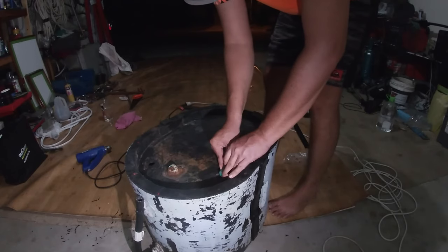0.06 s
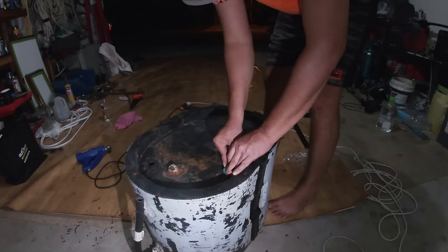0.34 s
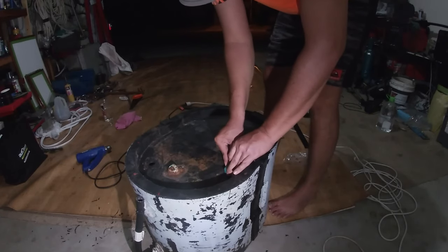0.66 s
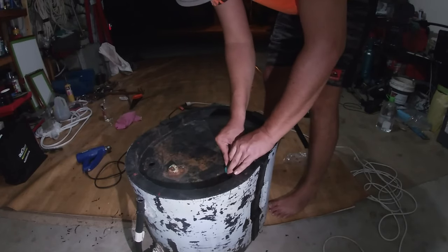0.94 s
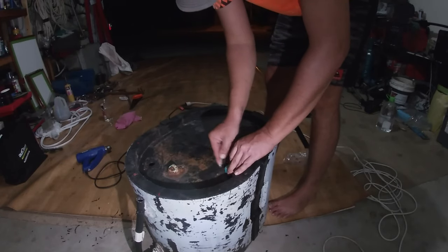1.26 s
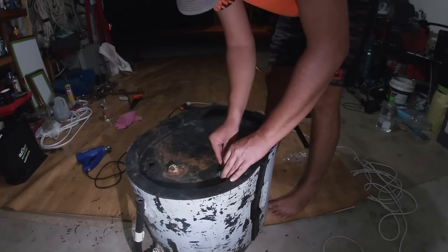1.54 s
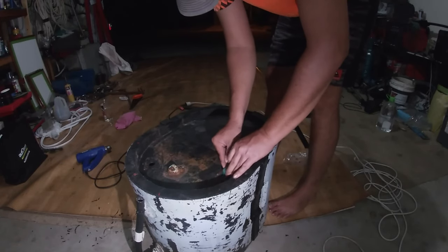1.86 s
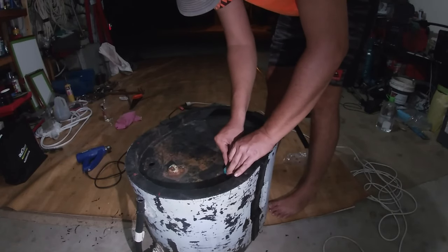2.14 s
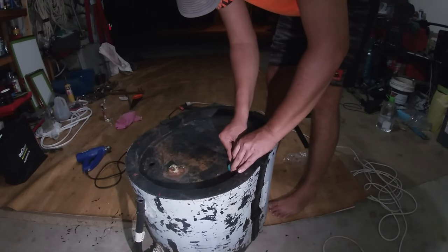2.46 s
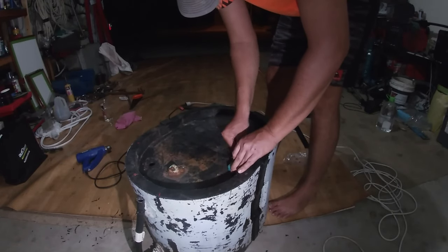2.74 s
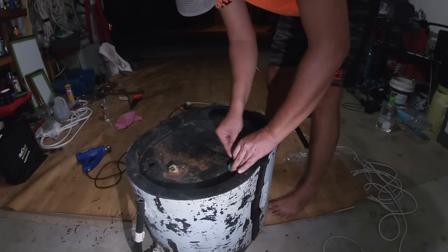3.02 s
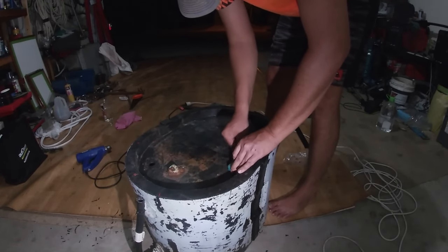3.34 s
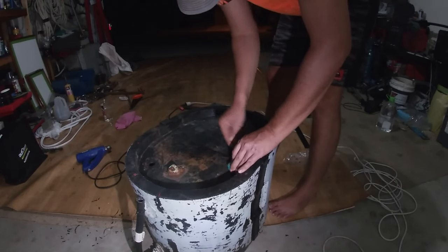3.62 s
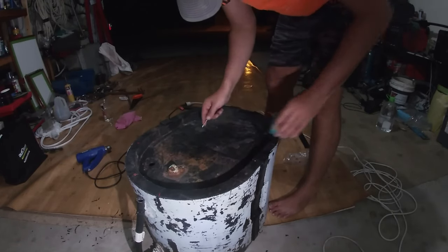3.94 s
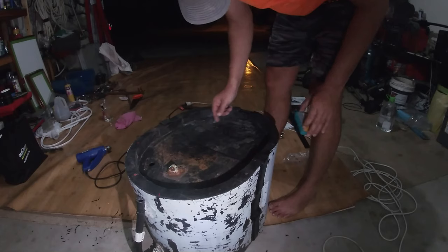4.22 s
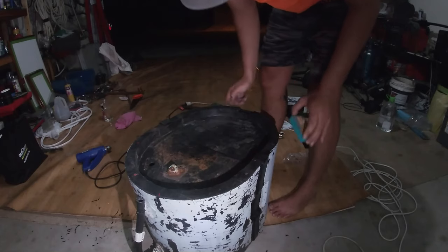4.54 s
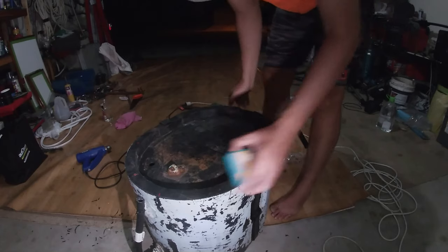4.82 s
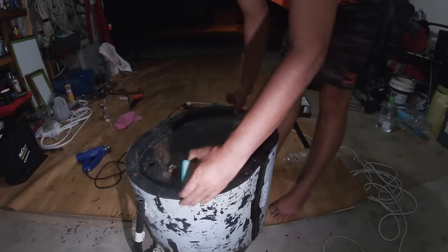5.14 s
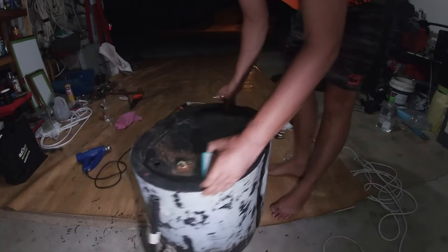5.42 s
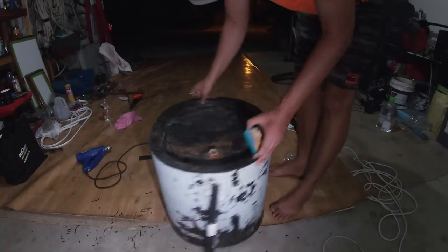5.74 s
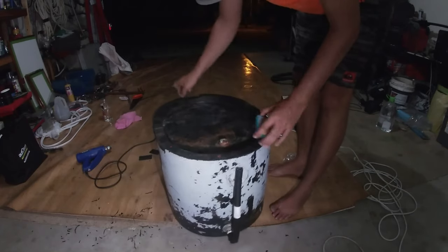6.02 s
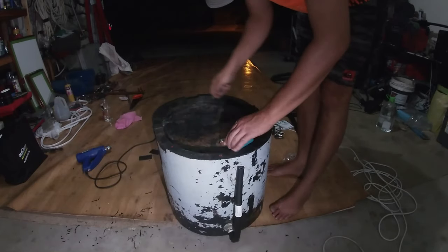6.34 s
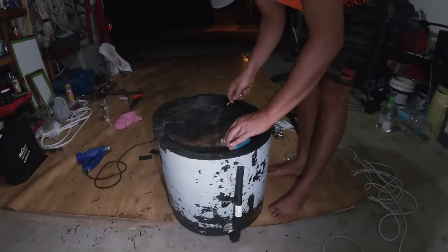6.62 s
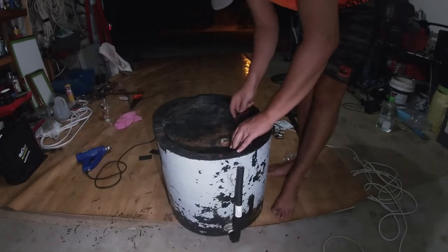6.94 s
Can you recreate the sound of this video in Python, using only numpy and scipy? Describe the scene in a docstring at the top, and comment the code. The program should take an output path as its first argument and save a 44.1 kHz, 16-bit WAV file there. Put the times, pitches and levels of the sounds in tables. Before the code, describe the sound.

In a quiet garage, irregular nearby scrapes and ticks come from a blade cutting at a big plastic tub, whose hollow walls vibrate and briefly groan. A sharp snap comes partway through, then the loudest sound, a crack with a deep judder as the plastic springs back. The tub's base then crunches and hisses across the sandy floor, and hands and tool knock on the rim.

```python
"""A blade scores the rim of a thick plastic tub in a garage: its stick-slip shakes the walls
and rasps at the tip. The rim snaps once, groans, then gives way with a crack and a booming
judder as the whole tub springs back. The tub is dragged round over the gritty floor,
squeaking at its base, and hands and tool knock on the rim again."""
import sys
import numpy as np
from scipy import signal
from scipy.fft import rfft, irfft
from scipy.io import wavfile
from scipy.ndimage import uniform_filter1d

SR = 44100
rng = np.random.default_rng(int(sys.argv[2]) if len(sys.argv) > 2 else 0)


def store_wav(level_fs):
    """Save 16-bit WAV to argv[1]."""
    pcm = np.round(np.clip(np.atleast_2d(level_fs), -1, 1) * 32767)
    wavfile.write(sys.argv[1], SR, pcm.T.astype(np.int16))


N = 316179
TIME = np.arange(N) / SR

# resonances of the tub: pitch_hz, level_db
TUB_MODES = [(42, -10), (66, -3), (87, 0), (103, -3), (146, -7.5), (221, -1), (254, -4.5), (283, -7.5),
             (322, -8.5), (350, -10), (380, -9.5), (436, -11), (482, -8.5), (575, -12.5), (610, -13.5),
             (645, -16), (727, -18), (788, -15), (842, -15), (894, -16.5), (975, -19.5), (1060, -22),
             (1155, -25.5), (1272, -21.5), (1350, -25.5), (1452, -19.5), (1545, -44)]
FLEX_TOP_HZ, WALL_PIVOT_HZ = 180, 420   # the whole tub flexes below the first; tone tilts about the second


def from_db(db):
    return np.exp(np.asarray(db) * (np.log(10) / 20))


def rms_one(x):
    return x / np.sqrt(np.mean(x ** 2) + 1e-20)


def peak_one(x):
    return x / np.abs(x).max()


def at_hz(points, hz, column=1):
    points = np.array(points)
    return np.interp(np.log(np.maximum(hz, 1)), np.log(points[:, 0]), points[:, column])


def cut(x, hz, kind, order=2):
    return signal.sosfilt(signal.butter(order, np.clip(hz, 10, .45 * SR), kind, fs=SR, output="sos"), x)


def colour(x, spectrum, size=4096):
    """Minimum-phase EQ with the given curve."""
    cepstrum = irfft(np.log(from_db(at_hz(spectrum, np.fft.rfftfreq(size, 1 / SR)))))
    cepstrum[1:size // 2] *= 2
    cepstrum[size // 2 + 1:] = 0
    return signal.fftconvolve(x, irfft(np.exp(rfft(cepstrum))))[:len(x)]


def resonate(x, hz, width_hz):
    """Two-pole resonance with unity gain at its peak."""
    r = np.exp(-np.pi * width_hz / SR)
    feedback = [1, -2 * r * np.cos(2 * np.pi * hz / SR), r * r]
    return signal.lfilter(np.array([1, 0, -1]) * (1 - r * r) / 2, feedback, x + 1e-18)


def mode_width(hz, base_hz=7.0, loss=.012):
    """Higher modes are broader, so they die sooner."""
    return base_hz + loss * hz


def drift(per_s):
    """Smooth random wander at unit RMS."""
    knots = rng.standard_normal(int(N / SR * per_s) + 2)
    return rms_one(np.interp(TIME * per_s, np.arange(len(knots)), knots))


def slips(per_s, spread_db, smooth):
    """Friction: tiny releases of uneven size at random moments, over smooth sliding noise."""
    sizes = from_db(spread_db * np.minimum(rng.exponential(1, N), 4)) * rng.choice([-1, 1], N)
    releases = rms_one(sizes * (rng.random(N) < per_s / SR))
    return rms_one(releases + smooth * rng.standard_normal(N))


def even(x, size=2205):
    """A steady push keeps the vibration at an even strength."""
    return x / np.sqrt(np.abs(uniform_filter1d(x * x, size)) + 1e-12)


def gestures(rows, levels_db, sag_db_per_s, release_db_per_s, linger_s=0):
    """A dB envelope per stroke: it touches, bites, swells, sags while the hand slows, and dies away."""
    touch_s, touch_db, swell_db = .015, 15.5, 15.5
    curves = []
    for (start, attack, hold, *_), db in zip(rows, levels_db):
        top = start + attack
        end = top + hold + linger_s
        bite_db, eased_db = db - swell_db, db - sag_db_per_s * hold
        path_db = [bite_db - touch_db, bite_db, db, eased_db, eased_db - release_db_per_s]
        curves.append(np.interp(TIME, [start - touch_s, start, top, end, end + 1], path_db, left=-np.inf))
    return np.array(curves)


def leading(curves, values):
    """The value of the strongest stroke of the moment, crossfaded at the changes."""
    return uniform_filter1d(values[curves.argmax(axis=0)], size=900)


def tub(force, wall_db, tilt, flex_db, damping):
    """Friction drives the tub's slow flexing and its wall modes; a sharper bite favours the high ones."""
    flex, wall = 0, 0
    for k, (hz, db) in enumerate(TUB_MODES):
        mode = (-1) ** k * from_db(db) * resonate(force, hz, mode_width(hz) * damping)
        if hz < FLEX_TOP_HZ:
            flex += mode
        else:
            wall += mode * from_db(np.clip(tilt, -10, 10) * np.log2(hz / WALL_PIVOT_HZ))
    return from_db(flex_db) * even(flex, size=1500) + from_db(wall_db) * even(wall, size=900)


def blade(flex_gain_db=0.55, rasp_gain_db=3.0, bite_tilt=1.7, catch_db=2.5, snag_db=-8):
    """The edge catches and lets go in the plastic; the rasp at the tip fades first as a stroke slows."""
    # strokes of blade and fingers along the rim:
    # start_s, attack_s, hold_s, wall_db, tilt_db_per_octave, flex_db, rasp_db
    strokes = [(-0.03, .04, 0.24, -44, -3, -39.5, -52.5), (0.492, 0.095, 0.057, -36, 0, -33.5, -50),
               (0.908, 0.029, 0.093, -45.5, -1, -44, -58), (1.078, 0.066, 0.2, -67, 1, -74, -67.5),
               (1.32, 0.021, .3, -57, -7.5, -59, -64.5), (1.69, 0.11, 0.029, -37, 1.5, -65.5, -50.5),
               (2.04, 0.017, 0.13, -48.5, -8, -58.5, -68), (2.11, 0.1, 0.012, -38, 2, -48, -49),
               (2.25, 0.032, 0.23, -44, -3, -45.5, -60), (2.453, 0.1, .08, -35, -1, -35, -47),
               (2.605, 0.047, 0.078, -37.5, 0, -36, -47.5), (2.985, 0.033, 0.098, -36, 0.5, -36, -44.5),
               (3.125, 0.022, 0.037, -34.5, -3.5, -33.5, -51.5),
               (3.226, 0.037, 0.057, -51.5, -8.5, -56.5, -69), (3.548, 0.018, 0.093, -43, -3.5, -49.5, -56),
               (3.65, 0.026, 0.071, -36, 2, -43, -43.5), (3.733, 0.0058, .045, -21.5, -4, -24.5, -34.5),
               (3.9, .05, 0.037, -52, -4, -49, -56), (4.057, 0.086, .13, -63, -9, -64, -66.5),
               (6.643, .04, 0.0079, -44.5, 1, -62, -52.5), (6.83, 0.053, 0.023, -64.5, 3, -76, -72),
               (6.923, 0.027, 0.016, -50, 9.5, -73, -54), (7.036, 0.034, .02, -40.5, 7, -63.5, -48)]
    # tone of the rasping tip: frequency_hz, level_db
    rasp_eq = [(700, -19.5), (1200, 5.5), (1700, 3), (2500, -0.5), (3150, -2.5), (4300, -9), (5700, -7),
               (7500, -14.5), (8600, -20), (10000, -16.5), (11500, -36.5), (15000, -37)]
    wall_db, tilt, flex_db, rasp_db = np.transpose(strokes)[3:]
    wall = gestures(strokes, wall_db, sag_db_per_s=16.5, release_db_per_s=192)
    # the tub goes on flexing after the hand eases off
    flex = gestures(strokes, flex_db + flex_gain_db, sag_db_per_s=13, release_db_per_s=229.5,
                    linger_s=0.027)
    tip = gestures(strokes, rasp_db + rasp_gain_db, sag_db_per_s=40.5, release_db_per_s=159.5)
    force = slips(per_s=1200, spread_db=2.5, smooth=0.63) * from_db(catch_db * drift(110))
    chips = slips(per_s=70, spread_db=2.5, smooth=0)   # chips break off the edge
    snags = from_db(snag_db) * rms_one(colour(chips, rasp_eq))
    rasp = from_db(tip.max(axis=0)) * (even(colour(force, rasp_eq), size=1500) + snags)
    body = tub(force, wall.max(axis=0), leading(wall, tilt) + bite_tilt, flex.max(axis=0), damping=1.0)
    return rasp + body


def chatter(blow, db, per_s=900, rise_s=0.0097, t60_s=0.25):
    """After a blow the surfaces go on touching in a quick, dying run of tiny contacts."""
    t = np.arange(len(blow)) / SR
    envelope = (1 - np.exp(-t / rise_s)) * from_db(-60 * t / t60_s)
    touches = rng.standard_normal(len(t)) * (rng.random(len(t)) < per_s / SR) * envelope
    touches /= np.sqrt(np.sum(touches ** 2) + 1e-20)
    return blow + from_db(db) * signal.fftconvolve(blow, touches)[:len(t)]


def knocks(crack_gain_db=1.1, hand_damping=3.8, thud_tilt=2.1, contact_hz=1400, echo_s=.0023, echo=0.37):
    """Each blow rings the hand-damped walls and cracks in the rim; the crack comes back off the lid."""
    # snaps and knocks: start_s, thud_db, thud_low_cut_hz, crack_db, crack_high_cut_hz
    hits = [(0.05, -40, 300, -46, 11000), (0.493, -44, 300, -43, 5000), (0.549, -35, 150, -36.5, 6000),
            (0.9155, -38, 152, -41, 5000), (0.949, -36, 150, -52, 4000), (1.3477, -42.5, 720, -42, 5000),
            (1.508, -45.5, 120, -60, 3000), (1.582, -47.5, 150, -66, 2000), (2.045, -38.5, 249, -59, 1510),
            (2.3114, -20, 725, -11, 6040), (2.569, -36, 400, -29, 9000), (2.6573, -28.5, 300, -29.5, 12000),
            (2.988, -36, 300, -43, 3000), (3.06, -37.5, 300, -31.5, 13200), (3.5595, -29, 750, -38, 3000),
            (3.7352, -9, 300, -22, 6000), (3.738, -11, 310, -8.5, 8950), (3.9875, -34.5, 505, -32.5, 4540),
            (4.795, -54, 400, -70, 1500), (4.941, -43, 760, -46, 2200), (4.96, -40.5, 720, -43, 2200),
            (5.11, -35.5, 614, -32.5, 4500), (5.212, -49, 700, -36, 3970), (5.4915, -34, 400, -58, 1800),
            (5.552, -38.5, 303, -37, 14000), (5.657, -26.5, 100, -29.5, 3000),
            (6.647, -24.5, 653, -22.5, 2200), (6.9362, -37.5, 563, -40, 2400),
            (7.0405, -25, 410, -29.5, 6540), (7.0765, -22.5, 426, -26.5, 1800)]
    # heavily damped resonances of the stiff rim: pitch_hz, width_hz, level_db
    rim_modes = [(1950, 590, -4), (2990, 1000, 4.5), (3550, 670, -2.5), (5400, 610, -12), (7420, 590, -8),
                 (10200, 1500, -17.5)]
    size = 16384
    out, click = np.zeros(N + size), signal.unit_impulse(size)
    push = cut(click, contact_hz, "low", order=3)   # the plastic yields, so the walls feel a rounded push
    walls = np.array([from_db(db + thud_tilt * np.log2(hz / WALL_PIVOT_HZ))
                      * resonate(push, hz, mode_width(hz) * hand_damping) for hz, db in TUB_MODES])
    rim = np.array([from_db(db) * resonate(click, hz, width_hz) for hz, width_hz, db in rim_modes])
    rim = cut(rim, 12500, "low", order=4)
    for start_s, thud_db, low_cut_hz, crack_db, high_cut_hz in hits:
        # each blow rings the wall modes with random signs, so every thud sounds slightly different
        weights = rng.choice([-1, 1], len(walls)) * rng.uniform(0.97, 0.99, len(walls))
        thud = peak_one(cut(weights @ walls, low_cut_hz, "high", order=4))
        crack = peak_one(cut(rng.uniform(0.87, 1.1, len(rim)) @ rim, high_cut_hz, "low"))
        crack = chatter(crack, db=-4, per_s=6000, rise_s=.0004, t60_s=.014)
        crack += echo * np.roll(crack, int(echo_s * SR))
        thud = chatter(thud, db=-7)
        at = int(start_s * SR)
        out[at:at + size] += from_db(thud_db) * thud + from_db(crack_db + crack_gain_db) * crack
    return out[:N]


def squeal(peak_s=1.196, swell_s=0.15, hz=4100, width_hz=1000, db=-66):
    """Drawn back lightly, the blade gives a faint, rough squeal."""
    swell = np.exp(-((TIME - peak_s) / swell_s) ** 2)
    return from_db(db) * swell * rms_one(resonate(rng.standard_normal(N), hz, width_hz))


def groans(waver=.012):
    """Stick-slip locks on to one mode, swells and lets go."""
    # groans of the wall and squeaks of the base: peak_s, pitch_hz, rms_db, swell_s
    tones = [(1.81, 483, -39.5, 0.025), (1.81, 808, -45, 0.03), (2.224, 488.2, -35.5, 0.012),
             (3.6, 234, -45.5, 0.027), (3.651, 226, -28.5, 0.02), (5.623, 3170, -42.5, 0.0029),
             (5.812, 3080, -41.5, 0.0058), (6.235, 831, -46, 0.022), (6.25, 1900, -45, .009)]
    out = 0
    for peak_s, hz, db, swell_s in tones:
        phase = 2 * np.pi * np.cumsum(hz * (1 + waver * drift(60))) / SR
        swell = np.exp(-((TIME - peak_s) / swell_s) ** 2)
        out += from_db(db) * swell * np.sqrt(2) * np.sin(phase)
    return out


def boom(start_s=3.741, low_hz=86.8, high_hz=104.3, t60_s=.3, db=-13.0, upper_share=.8):
    """The rim gives way and the tub springs back: two close flexing modes start opposed, swell and beat."""
    t = np.maximum(TIME - start_s, 0)
    beating = np.sin(2 * np.pi * low_hz * t) - upper_share * np.sin(2 * np.pi * high_hz * t)
    return from_db(db - 60 * t / t60_s) * beating


def drag(wall_gain_db=0.2, flex_gain_db=-2.0, grit_gain_db=3.0, sand_gain_db=0.5,
         floor_tilt=3.4, catch_db=2.0):
    """With each shove the base crunches over grit, which shakes the walls, and hisses over fine sand."""
    # shoves of the tub over the floor:
    # start_s, attack_s, hold_s, wall_db, tilt_db_per_octave, flex_db, grit_db, sand_db
    shoves = [(4.988, 0.085, 0.038, -48.5, 3.5, -64, -52.5, -63),
              (5.17, 0.047, 0.096, -52.5, -2, -58, -57, -76),
              (5.397, 0.047, 0.012, -52.5, -1, -44, -60.5, -73),
              (5.532, 0.059, 0.029, -44.5, 1, -32, -51, -61), (5.623, 0.05, 0.3, -40, 0.5, -35, -45.5, -55),
              (5.628, .11, 0.027, -46, 0, -42, -44, -41.5), (5.874, 0.034, 0.28, -44, 3.5, -45.5, -45, -57),
              (6.088, 0.079, 0.047, -47.5, 5, -53, -42.5, -55),
              (6.168, 0.067, 0.068, -42.5, 7, -54.5, -41, -57),
              (6.302, 0.037, 0.045, -49, 3.5, -68, -48.5, -63),
              (6.47, 0.046, 0.034, -71, -7, -56, -66, -76)]
    # tone of the coarse grit: frequency_hz, level_db
    grit_eq = [(500, -16), (850, -1.5), (1900, 6), (3400, 4.5), (4300, 2), (5800, -1.5), (7700, -11),
               (9000, -17.5), (12000, -41)]
    # tone of the fine sand: frequency_hz, level_db
    sand_eq = [(4000, -4), (7000, 1), (8500, -2), (10000, 3.5), (11500, -16.5), (14500, -18), (16000, -32)]
    wall_db, tilt, flex_db, grit_db, sand_db = np.transpose(shoves)[3:]
    wall, coarse, fine = (gestures(shoves, db, sag_db_per_s=18, release_db_per_s=150)
                          for db in (wall_db + wall_gain_db, grit_db, sand_db))
    flex = gestures(shoves, flex_db + flex_gain_db, sag_db_per_s=40, release_db_per_s=260)
    force = slips(per_s=2500, spread_db=2.5, smooth=0.85) * from_db(catch_db * drift(70))
    grit = from_db(coarse.max(axis=0) + grit_gain_db) * even(colour(force, grit_eq))
    grains = slips(per_s=3600, spread_db=0.0, smooth=0.82)
    sand = from_db(fine.max(axis=0) + sand_gain_db) * even(colour(grains, sand_eq))
    body = tub(force, wall.max(axis=0), leading(wall, tilt) + floor_tilt, flex.max(axis=0), damping=2.6)
    return grit + sand + body


def garage(x, predelay_s=0.0043, size=32768):
    """The diffuse tail of the room, dying band by band."""
    # garage reverb: frequency_hz, t60_s, level_db
    reverb = [(99, 0.29, -11), (296, 0.42, -4.5), (800, 0.48, -9.5), (3000, 0.36, -4), (6990, 0.38, -5),
              (14030, .28, -20.5)]
    t, tail = np.arange(size) / SR, 0
    edges_hz = np.geomspace(60, 16000, 12)
    for low, high in zip(edges_hz, edges_hz[1:]):
        hz = np.sqrt(low * high)
        decay = from_db(-60 * t / at_hz(reverb, hz)) * (t > predelay_s)
        band = cut(rng.standard_normal(size), [low, high], "band") * decay
        band *= np.sqrt(2 * (high - low) / SR / np.sum(band ** 2))   # unity gain within the band
        tail += from_db(at_hz(reverb, hz, column=2)) * band
    return signal.fftconvolve(x, tail)[:N]


def scene(air_db=-66, scrape_db=-1.0, friction_send_db=-2.5, knock_send_db=2.5):
    """Work on the tub in the garage, over still air."""
    # room tone of the still air: frequency_hz, level_db
    air_eq = [(15, -44.5), (25, -15), (113, -22.5), (164, -3), (274, -23), (495, -23.5), (782, -15.5),
              (1020, -19.5), (2170, -26), (2550, -26.5), (6550, -26.5), (8570, -32), (15500, -59)]
    air = from_db(air_db) * rms_one(colour(rng.standard_normal(N), air_eq))
    friction = from_db(scrape_db) * (blade() + drag()) + groans() + squeal()
    blows = knocks()
    room = garage(from_db(friction_send_db) * friction + from_db(knock_send_db) * blows)
    return (friction + blows + boom() + room + air)[None]


def record(dry, high_cut_hz=15400):
    """A steep high cut on the whole mix."""
    return signal.sosfilt(signal.ellip(10, .1, 80, high_cut_hz, fs=SR, output="sos"), dry)


dry = scene()
out = record(dry)
store_wav(out)
```